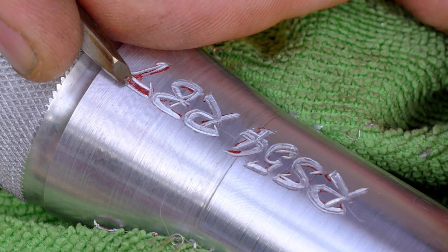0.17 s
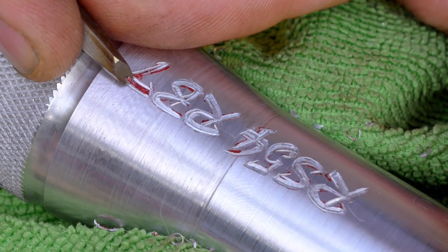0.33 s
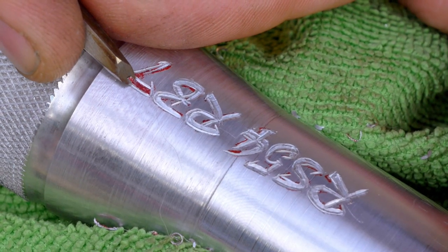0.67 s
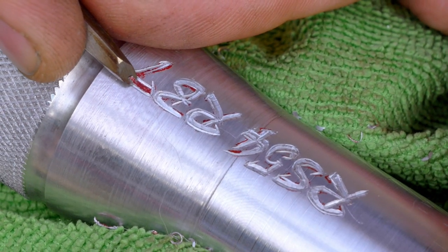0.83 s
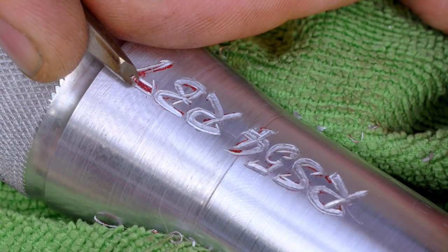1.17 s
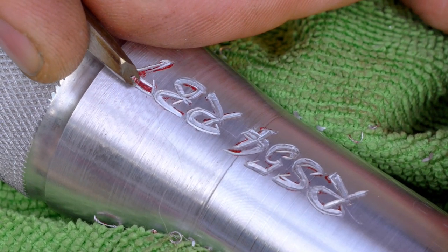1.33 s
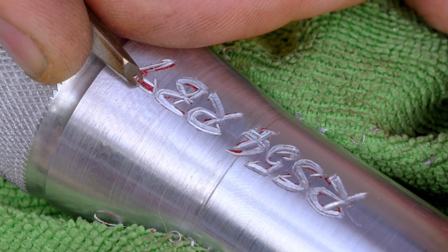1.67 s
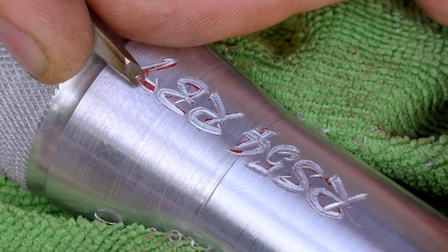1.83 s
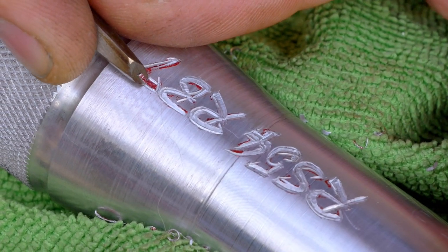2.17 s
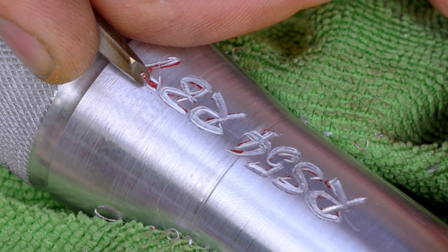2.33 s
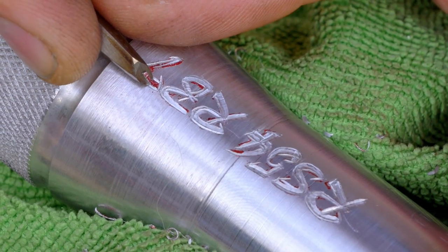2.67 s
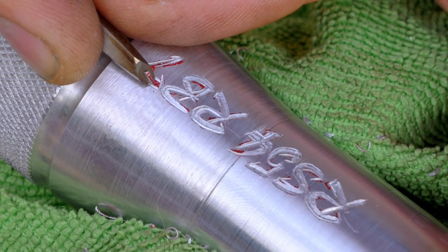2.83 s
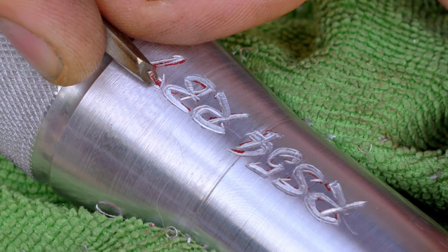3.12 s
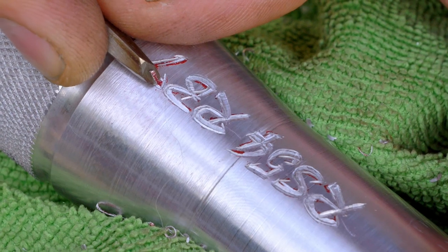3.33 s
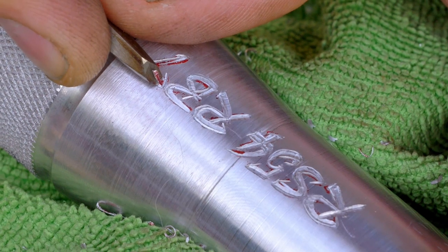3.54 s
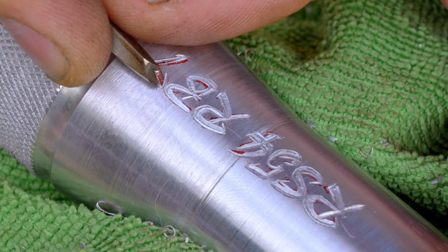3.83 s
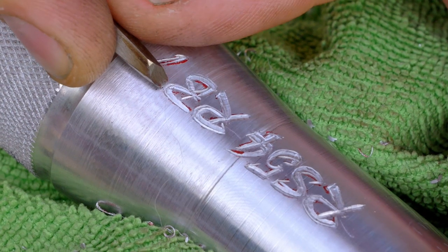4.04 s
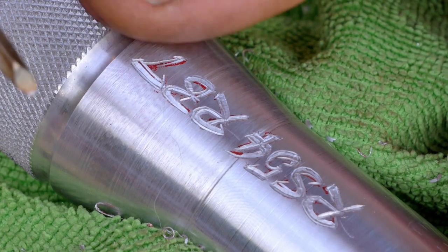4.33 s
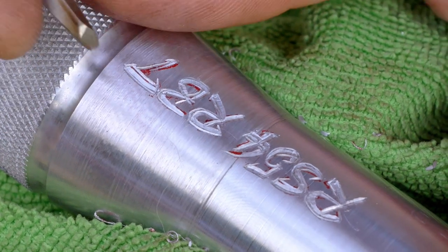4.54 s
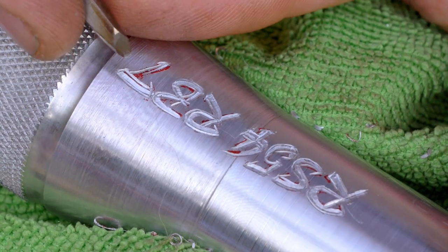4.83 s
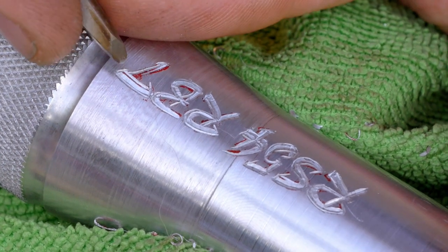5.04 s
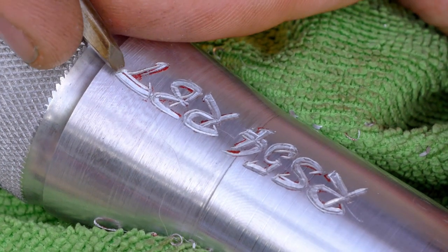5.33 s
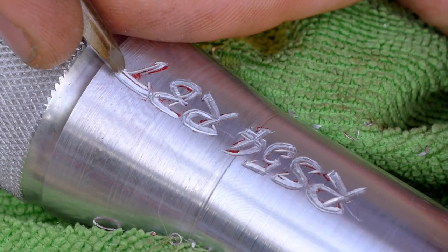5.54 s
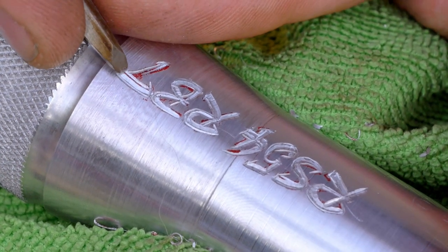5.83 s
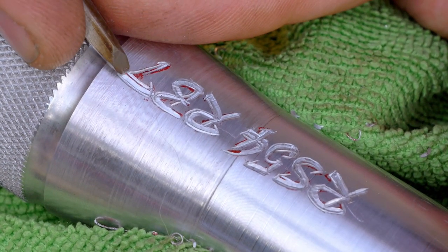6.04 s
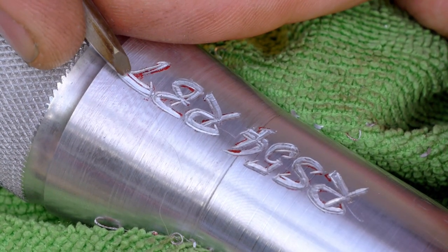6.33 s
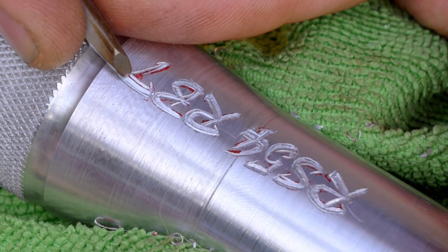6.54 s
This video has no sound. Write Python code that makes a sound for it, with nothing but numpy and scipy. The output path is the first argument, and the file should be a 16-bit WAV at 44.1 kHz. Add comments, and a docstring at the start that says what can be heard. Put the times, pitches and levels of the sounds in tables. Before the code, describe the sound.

Rapid puffs of air from a pneumatic engraving tool make a steady high buzzing hiss, with dull little knocks as it cuts metal.

```python
"""A small workshop, close to an air-driven hand engraver cutting steel.
Each piston stroke vents a short bright puff of air, 27 a second, with a dull knock, a ring of the
handpiece and a hollow gasp on the return. The hand leans into the cut twice and the knock grows.
It then swings the tool clear and back, which colours the hiss; running free, the piston clacks twice.
Behind it: a steady air leak and a faint bench rumble."""
import sys
import numpy as np
from scipy import signal
from scipy.fft import rfft, irfft
from scipy.io import wavfile
from scipy.ndimage import uniform_filter1d

SR = 44100
rng = np.random.default_rng(int(sys.argv[2]) if len(sys.argv) > 2 else 0)


def master_out(mix):
    """Clip the mix to full scale and print it as 16-bit PCM to the path in sys.argv[1]."""
    frames = np.transpose(np.atleast_2d(mix))
    ceiling = np.clip(frames, -1, 1)
    pcm = np.round(ceiling * 32767).astype(np.int16)
    wavfile.write(sys.argv[1], SR, pcm)


N = 295029

# Valve timing drift. Each row: time in seconds, lag in seconds.
VALVE_LAG = [(0, -.001), (.4, .0002), (2.3, .0006), (2.7, -.0015), (3.75, -.0014), (4.5, .0018),
             (5.05, .0023), (5.4, .0005), (5.95, .0006), (6.55, -.0026)]
# Exhaust air. Each row: frequency in Hz, relative density in dB.
EXHAUST_SPECTRUM = [(50, -78), (130, -49), (300, -45.5), (900, -31), (1650, -28), (2050, -14.5),
                    (2520, -14.5), (2750, -23), (4100, -15), (5600, -16), (7650, -22), (8500, -12),
                    (10400, -14), (11200, -19.5), (15500, -27)]
# Tool height, low in the cut, 1 fully clear. Each row: time in seconds, lift from 0 to 1.
TOOL_LIFT = [(4.1, 0.12), (4.3, 0.97), (4.65, 0.81), (4.9, 0.8), (5.45, 0.58), (5.7, 0.57), (6.69, 0.15)]
# Hollows between fingers and tool. Each row: centre in Hz, width in Hz, gain in dB, lift of full effect.
HAND_HOLLOWS = [(2200, 370, 6.5, 0.63), (2450, 520, -10.5, 0.77), (3850, 800, -5, 0.92),
                (4000, 840, 6, 0.42), (4416, 273, 8, 0.02), (4950, 220, -2, 0.1), (5080, 450, 5, 0.6),
                (6180, 1600, -7, 0.98), (8000, 430, 4.5, 1), (11040, 1060, -6.5, 0.76),
                (11460, 600, 7.5, 0.83), (13200, 750, 6, .62), (14400, 500, 10, 0.33)]
# Sway of the exhaust port. Each row: time in seconds, extra path to the right channel in metres.
PORT_SWAY = [(.5, -.004), (1.55, .016), (1.85, .001), (2.7, -.004), (3, -.016), (4.1, -.019), (4.9, -.004),
             (5.3, .01), (6.2, .003)]
# Handpiece metal. Each row: frequency in Hz, width in Hz, level in dB.
HANDPIECE_MODES = [(2292, 77, -50), (2406, 39, -45.5), (2524, 25, -50), (4070, 33, -71), (9290, 97, -38.5)]
# Piston knock through tool and work. Each row: frequency in Hz, relative density in dB.
KNOCK_SPECTRUM = [(40, -41), (105, -12.5), (175, -4.5), (350, 6), (600, 5.5), (1150, -0.5), (1500, 6.5),
                  (3000, -22), (8000, -50)]
# Hand leaning into the cut. Each row: peak time in seconds, width in seconds, knock gain in dB.
HAND_PUSHES = [(2.834, 0.24, 7.5), (3.6, 0.34, 7.5)]
# Air column of hose and cylinder. Each row: frequency in Hz, width in Hz, base level in dB,
# lead before the puff in seconds, burst half-width in seconds.
AIR_COLUMN_MODES = [(412.5, 86, -59, 0.019, 0.006), (577, 67, -54, 0.01755, 0.0057),
                    (1105, 130, -53, 0.013, 0.012), (1248, 62, -54.5, 0.015, 0.0086)]
# Return stroke strength. Each row: time in seconds, gain in dB for a mode at 1200 Hz.
RETURN_FORCE = [(0, 0), (2.9, -1.5), (3.12, -6), (3.55, 3), (5.3, 1.8), (5.7, -3.5), (6.15, 3),
                (6.69, -2.5)]
# Hard piston landings. Each row: time in seconds, level in dB.
HARD_LANDINGS = [(5.043, -20.5), (5.372, -16.5)]
# Air leak. Each row: frequency in Hz, relative density in dB.
LEAK_SPECTRUM = [(40, -44), (110, -31), (220, 0.5), (400, -13), (800, 3.5), (1200, -1), (1600, 1),
                 (2050, 10), (2850, 7), (3350, 7), (4200, 9), (5600, -13), (9300, 10), (15500, -5)]
# Hands bumping the work. Each row: time in seconds, level in dB.
HAND_BUMPS = [(.23, -62), (.81, -69), (1.02, -65), (1.47, -89), (1.87, -64), (2.05, -69), (2.79, -76),
              (4.53, -64), (6.19, -60), (6.6, -63)]
# Workshop decay. Each row: frequency in Hz, T60 in seconds.
ROOM_T60 = [(200, 0.14), (2500, 0.13), (9000, 0.037), (15000, 0.027)]
# Stereo lean of the shaped noises. Each row: frequency in Hz, left over right in dB.
STEREO_BALANCE = [(150, 0.5), (700, 2.5), (1600, 4), (2400, -0.5), (3000, 4.5), (5000, 3.5), (10000, 3),
                  (13000, 1), (15500, 2)]

STROKE_HZ, FIRST_STROKE_S = 27.15, .0314
PORT_HZ, PORT_SAG_HZ = 9350, 130  # exhaust resonance, its drop at full lift
TREMOR_M, SOUND_M_PER_S = .004, 343
TIME_S = np.arange(N) / SR
BINS_HZ = np.fft.rfftfreq(1024, 1 / SR)
FRAMES_S = np.arange(N // 256 + 5)[:, None] * 256 / SR


def exhaust(drive):
    """Turbulent puffs, coloured by the port and the hand around it."""
    lift = at_time(TOOL_LIFT, FRAMES_S)
    port_db = 9 * bell(BINS_HZ - (PORT_HZ - PORT_SAG_HZ * lift), 1120)
    colour_db = at_pitch(EXHAUST_SPECTRUM, BINS_HZ) + port_db
    for hz, width_hz, db, tuned_lift in HAND_HOLLOWS:
        colour_db += db * bell(lift - tuned_lift, .38) * bell(BINS_HZ - hz, width_hz)
    colour_db += 3.02 * patches(frames=9, bins=10)  # no two puffs alike
    flow = puff_envelope(core_s=.0075, skirt_s=.028, skirt_db=-17, skirt_lag_s=-.00019)
    eddies_db = 2.67 * flutter(rate_hz=1400)  # jet sputters within each puff
    return even_puffs(noise(colour_db, flow * amp(eddies_db), port_coherence())) * drive


def puff_envelope(core_s, skirt_s, skirt_db, skirt_lag_s):
    """Envelope of each puff: a short peak on a wider skirt, with timing jitter."""
    t = stroke_offset_s() + .00035 * flutter(rate_hz=25, channels=1)
    return np.hypot(bell(t, core_s), amp(skirt_db) * bell(t - skirt_lag_s, skirt_s))


def even_puffs(puffs):
    """Evens out the puffs: each is equally loud, in both channels."""
    stroke = stroke_index()
    energy = np.array([np.bincount(stroke, channel ** 2) for channel in puffs])
    energy[:, [0, -1]] = energy.mean()  # partial strokes keep their own size
    return unit(puffs / np.sqrt(energy[:, stroke]))


def pressure(base_db=-.33, full_lift_db=1.4, scatter_db=.47):
    """Air pulse strength: uneven per stroke, higher as the tool lifts clear."""
    stroke = stroke_index()
    scatter = rng.standard_normal(stroke[-1] + 1)[stroke]
    return amp(base_db + full_lift_db * at_time(TOOL_LIFT, TIME_S) + scatter_db * scatter)


def port_coherence(share=.42):
    """Port hiss common to both channels; sway and tremor shift its phase."""
    tremor = np.interp(FRAMES_S, TIME_S, flutter(rate_hz=1.9, channels=1)[0])
    delay_s = (at_time(PORT_SWAY, FRAMES_S) + TREMOR_M * tremor) / SOUND_M_PER_S
    return share * bell(BINS_HZ - PORT_HZ, 3000) * np.exp(-2j * np.pi * BINS_HZ * delay_s)


def handpiece(drive):
    """Each stroke rings the metal of the tool."""
    blows = rng.standard_normal((2, N)) * bell(stroke_offset_s(lead_s=.0033), .0068) * drive
    return sum(amp(db) * ring(blows, hz, width_hz) for hz, width_hz, db in HANDPIECE_MODES)


def knock(light_hand_db=-53):
    """The piston lands just before each puff, louder as the hand bears down."""
    blows = bell(stroke_offset_s(lead_s=.0013), .0034)
    push_db = sum(db * bell(TIME_S - peak_s, width_s) for peak_s, width_s, db in HAND_PUSHES)
    return amp(light_hand_db + push_db) * noise(at_pitch(KNOCK_SPECTRUM, BINS_HZ), blows)


def return_gasp():
    """Between puffs the returning piston sounds the hollow air column."""
    out = np.zeros((2, N))
    unsteady_db = 2.6 * flutter(rate_hz=9.7, channels=1)
    for hz, width_hz, db, lead_s, half_width_s in AIR_COLUMN_MODES:
        bursts = rng.standard_normal((2, N)) * bell(stroke_offset_s(lead_s), 2 * half_width_s)
        force_db = at_time(RETURN_FORCE, TIME_S) * (hz / 1200) ** 2  # upper modes respond most
        mode = ring(ring(bursts, hz, width_hz), hz, 4 * width_hz)
        out += amp(db + force_db + unsteady_db) * mode
    return out * amp([[.8], [-.8]])  # slightly left


def clacks(width_s=.004):
    """The free-running piston lands metal on metal: sharp ticks."""
    level = sum(amp(db) * bell(TIME_S - peak_s, width_s) for peak_s, db in HARD_LANDINGS)
    return level * ring(rng.standard_normal((2, N)), hz=4970, width_hz=450)


def workshop(x, onset_s=.0058):
    """Short diffuse room tail; treble dies first."""
    hz, t, spectra = signal.stft(rng.standard_normal((2, SR // 2)), SR, nperseg=256)
    decay = amp(-60 * t / at_pitch(ROOM_T60, hz)[:, None])
    tail = signal.istft(spectra * decay, SR, nperseg=256)[1]
    tail *= np.clip(np.arange(tail.shape[1]) / SR / onset_s, 0, 1)
    return signal.fftconvolve(x, tail / np.linalg.norm(tail[0]), axes=1)[:, :N]


def leak():
    """Steady hiss of escaping air."""
    return noise(at_pitch(LEAK_SPECTRUM, BINS_HZ))


def bench():
    """Hands on the work: faint uneven rumble with soft bumps."""
    level = amp(-90 + 13 * np.tanh(1.5 * flutter(rate_hz=5.7, channels=1)))
    for peak_s, db in HAND_BUMPS:
        level += amp(db) * bell(TIME_S - peak_s, .04)
    rumble_db = at_pitch([(20, 0), (70, -1), (170, -4), (400, -20), (1500, -70)], BINS_HZ)
    return level * noise(rumble_db)


def stroke_count(lead_s=0):
    """Running stroke count; integers fall on the puffs, or lead_s before."""
    return (TIME_S - at_time(VALVE_LAG, TIME_S) - FIRST_STROKE_S + lead_s) * STROKE_HZ


def stroke_index():
    """Number of the nearest stroke, from 0."""
    stroke = np.round(stroke_count()).astype(int)
    return stroke - stroke[0]


def stroke_offset_s(lead_s=0):
    """Signed time from the nearest point lead_s before a puff."""
    return ((stroke_count(lead_s) + .5) % 1 - .5) / STROKE_HZ


def noise(colour_db, flow=1, coherence=0):
    """Stereo noise of rms 1: follows flow, shaped and panned by band."""
    white = flow * rng.standard_normal((2, N))
    left, other = signal.stft(white, nperseg=1024, noverlap=768)[2].swapaxes(1, 2)
    shared = (coherence * np.ones((len(FRAMES_S), 1)))[:len(left)]
    right = shared * left + np.sqrt(1 - abs(shared) ** 2) * other
    lean_db = np.array([.5, -.5])[:, None, None] * at_pitch(STEREO_BALANCE, BINS_HZ)
    spectra = np.array([left, right]) * amp(colour_db + lean_db)[:, :len(left)]
    return unit(signal.istft(spectra.swapaxes(1, 2), nperseg=1024, noverlap=768)[1][:, :N])


def ring(x, hz, width_hz):
    """One resonance, rms 1."""
    return unit(signal.lfilter(*signal.iirpeak(hz, hz / width_hz, SR), x))


def flutter(rate_hz, channels=2):
    """Smooth random signal of rms 1, rolling off at rate_hz."""
    size = 2 ** 19
    lowpass = bell(np.fft.rfftfreq(size, 1 / SR), 2 * rate_hz)
    return unit(irfft(rfft(rng.standard_normal((channels, size))) * lowpass)[:, :N])


def patches(frames, bins):
    """Random time-frequency patches, rms 1."""
    field = rng.standard_normal((len(FRAMES_S), len(BINS_HZ)))
    return unit(uniform_filter1d(uniform_filter1d(field, frames, axis=0), bins, axis=1))


def bell(offset, width):
    """Gaussian of height 1; full width at half height."""
    return 2 ** -(2 * offset / width) ** 2


def at_time(rows, t):
    """Curve value at times t."""
    return np.interp(t, *np.transpose(rows))


def at_pitch(rows, hz):
    """Curve value on a log-frequency axis."""
    row_hz, value = np.transpose(rows)
    return np.interp(np.log(hz + 1), np.log(row_hz + 1), value)


def amp(db):
    """dB to gain."""
    return 10 ** (np.asarray(db) / 20)


def unit(x):
    """Scale to rms 1."""
    return x / np.sqrt(np.mean(x ** 2) + 1e-20)


def scene():
    """Engraver, room tail, leak and bench."""
    drive = pressure()
    tool = amp(-25) * exhaust(drive) + knock() + handpiece(drive) + return_gasp() + clacks()
    return tool + amp(-14) * workshop(tool) + amp(-41) * leak() + bench()


def record(dry):
    """Steep low-pass at 15850 Hz."""
    lowpass = signal.firwin(601, 15850, window=("kaiser", 9), fs=SR)
    return signal.oaconvolve(dry, lowpass[None], "same")


dry = scene()
out = record(dry)
master_out(out)
```